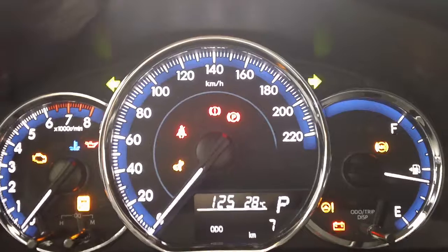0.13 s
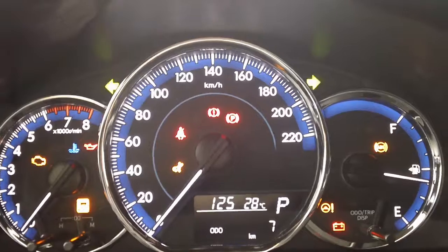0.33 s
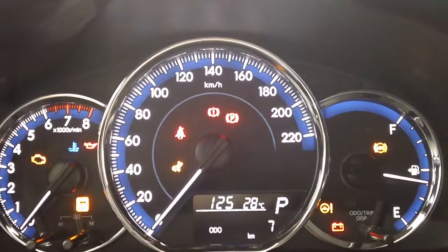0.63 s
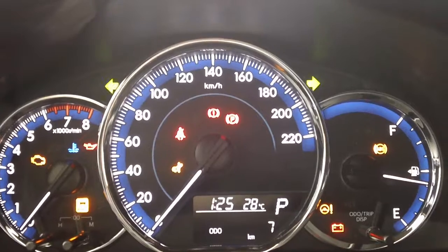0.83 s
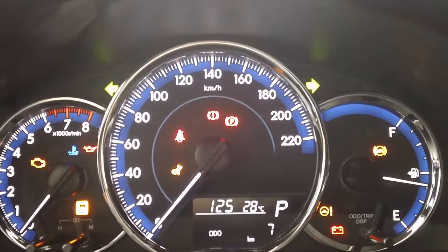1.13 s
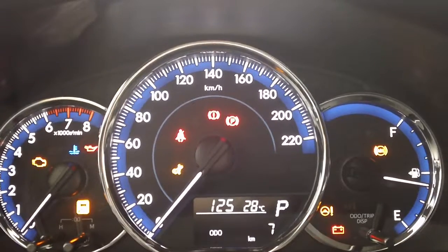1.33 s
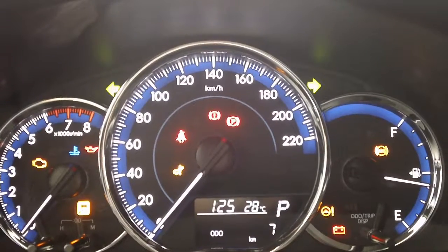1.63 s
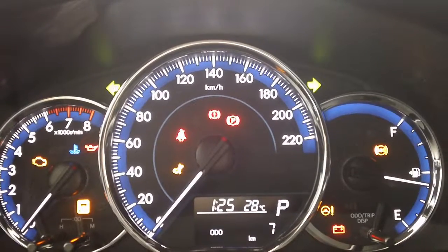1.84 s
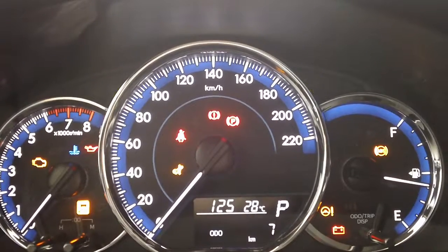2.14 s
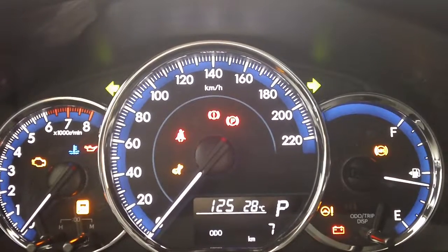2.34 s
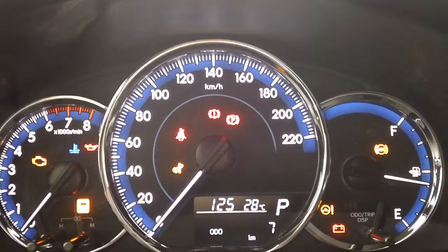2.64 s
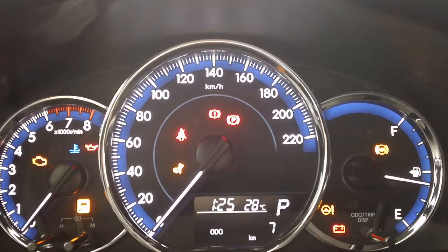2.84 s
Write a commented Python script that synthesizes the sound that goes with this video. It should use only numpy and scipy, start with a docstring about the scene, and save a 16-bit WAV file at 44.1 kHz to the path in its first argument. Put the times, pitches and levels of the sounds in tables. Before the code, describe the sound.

A car flasher relay ticks evenly, alternating fuller and thinner clicks, over steady soft hiss

```python
"""After a brief silence, soft hiss cuts in over a faint low hum, and all swells to full level in about a second.
Over it a flasher relay ticks evenly in a parked car: longer as the lamps light, shorter and thinner as they go out.
Hiss, hum and one brief high fizz are noise filtered by frequency; each tick is a sum of decaying modes,
and a dense tail of reflections from the cabin follows it. A notch and a low-pass shape the treble of all."""
import sys
import numpy as np
from scipy import signal
from scipy.fft import rfft, irfft
from scipy.io import wavfile

SR = 44100
rng = np.random.default_rng(int(sys.argv[2]) if len(sys.argv) > 2 else 0)


def bounce(signal):
    """Save signal as a 16-bit WAV file at the path given by the first command-line argument."""
    frames = np.transpose(np.atleast_2d(signal))
    limited = np.clip(frames, -1, 1)
    pcm = np.round(limited * 32767).astype(np.int16)
    wavfile.write(sys.argv[1], SR, pcm)


N = 131418
TIME = np.arange(N) / SR   # [s]
HZ = np.maximum(np.arange(N // 2 + 1) * SR / N, 1)   # frequency bins, kept above 0 for the logarithm

# levels are those ahead of the opening swell and the treble filters
HUM_HZ, HUM_WIDTH_HZ, HUM_DB = 58, 4, -80.5   # width: from the centre to half gain
HISS_DB = -38.5   # rms of the mid signal
FIZZ_HZ, FIZZ_WIDTH_HZ, FIZZ_DB = 13600, 1200, -40   # level: rms at the crest
FIZZ_CREST_S, FIZZ_LENGTH_S = .286, .008   # length: from the crest to 1/e
FIRST_CLOSING_S, BLINK_S, LIT_S = .1732, .7, .3498   # blink: whole period; lit: closing to opening
BUILD_S, CHATTER_S = .0006, .0026   # time constant of a mode's build-up; time before its decay starts
CABIN_DB, CABIN_T60_S, CABIN_DELAY_S = -13, .062, .0046   # energy of the tail against the direct tick
START_S = .106   # silence before this
NOTCH_HZ, NOTCH_WIDTH_HZ, NOTCH_CORE_HZ = 12510, 3040, 300   # core: width of the deepest part
CUTOFF_HZ = 15250


def from_db(db):
    """Amplitude gain from the logarithmic decibel scale."""
    return 10 ** (np.asarray(db) / 20)


def rms_one(x):
    """Normalise mean power: scale to unit rms."""
    return x / np.sqrt(np.mean(x ** 2) + 1e-20)


def gains(points):
    """Spectral envelope: (frequency [Hz], level [dB]) interpolated over log frequency."""
    hz, db = np.transpose(points)
    return from_db(np.interp(np.log(HZ), np.log(hz), db))


def noise(colour):
    """Spectral shaping: white noise weighted by a gain at every frequency."""
    spectrum = rfft(rng.standard_normal(N))
    return irfft(spectrum * colour, N)


def band(hz, width_hz):
    """Resonance-shaped noise: random energy gathered around one frequency, at unit rms."""
    resonance = 1 / (1 + ((HZ - hz) / width_hz) ** 2)
    return rms_one(noise(resonance))


def hum():
    """Narrow-band noise: so small a bandwidth is heard as a faint, wavering low tone."""
    return from_db(HUM_DB) * band(HUM_HZ, HUM_WIDTH_HZ)


def hiss():
    """Mid-side stereo: smooth broad noise, central but for a little independent width in the bass."""
    # spectrum of the hiss: (frequency [Hz], relative spectral density [dB])
    spectrum_points = [(25, -22), (45, -23), (80, -11), (130, -4), (220, -0.5), (450, 0.67), (1400, 0.64),
                       (4000, -1), (8700, -3.5), (12000, -8), (15000, -7)]
    # stereo width of the hiss: (frequency [Hz], side against mid [dB])
    width_points = [(30, -5), (170, -20.5), (700, -25), (1400, -67.5)]
    colour = rms_one(gains(spectrum_points))
    mid = noise(colour)
    side = noise(colour * gains(width_points))
    return from_db(HISS_DB) * np.array([mid + side, mid - side])


def fizz():
    """Amplitude modulation: a Gaussian pulse lets high band noise fizz up for a moment."""
    pulse = np.exp(-((TIME - FIZZ_CREST_S) / FIZZ_LENGTH_S) ** 2)
    return from_db(FIZZ_DB) * pulse * band(FIZZ_HZ, FIZZ_WIDTH_HZ)


def ring(start_s, hz, t60):
    """Damped oscillation: a mode builds up while the contact chatters, then decays; once in every blink."""
    age = np.maximum(TIME - start_s, 0) % BLINK_S   # time since the latest strike
    build_up = 1 - np.exp(-age / BUILD_S)
    decay = from_db(-60 * np.clip((age - CHATTER_S) / t60, 0, 2))
    return build_up * decay * np.sin(2 * np.pi * hz * age)


def relay():
    """Modal superposition: closing and opening strike the same modes, in different proportions."""
    # vibration modes of the relay: (frequency [Hz], level on closing [dB], level on opening [dB],
    # delay after the contact moves [s], time to decay by 60 dB [s])
    relay_modes = [(2650, -39.5, -51, .0028, .034), (3030, -39.5, -57, .003, .028),
                   (8920, -31, -33, .0001, 0.0066), (9200, -37, -56, .0029, .005),
                   (9430, -44, -58, 0.000395, .022)]
    ticks = np.zeros(N)
    for hz, close_db, open_db, delay_s, t60 in relay_modes:
        closing_s = FIRST_CLOSING_S + delay_s
        ticks += from_db(close_db) * ring(closing_s, hz, t60)
        ticks += from_db(open_db) * ring(closing_s + LIT_S, hz, t60)
    return ticks


def cabin(x):
    """Reverberation by convolution: dense reflections that the upholstery soon absorbs."""
    t = TIME[:SR // 4]
    decay = from_db(-60 * t / CABIN_T60_S)
    tail = rng.standard_normal(len(t)) * decay * (t > CABIN_DELAY_S)
    tail /= np.linalg.norm(tail)   # unit energy
    return from_db(CABIN_DB) * signal.fftconvolve(x, tail)[:N]


def scene():
    """Linear superposition: hum, fizz, ticks and reflections lie in the middle of the hiss."""
    ticks = relay()
    return hum() + hiss() + fizz() + ticks + cabin(ticks)


def record(dry):
    """Gain and filtering: the sound swells, a notch hollows the top treble, a low-pass cuts the very top."""
    # opening swell of everything: (time [s], level [dB])
    swell_points = [(.106, -10), (.37, -7), (.65, -4.5), (.95, -1.5), (1.2, 0), (2.98, -.2)]
    swell = from_db(np.interp(TIME, *np.transpose(swell_points)))
    out = dry * swell * (TIME >= START_S)
    for width_hz in (NOTCH_WIDTH_HZ, NOTCH_CORE_HZ):
        b, a = signal.iirnotch(NOTCH_HZ, NOTCH_HZ / width_hz, fs=SR)
        out = signal.lfilter(b, a, out)
    # order 12, 0.1 dB ripple, 70 dB rejection
    low_pass = signal.ellip(12, .1, 70, CUTOFF_HZ, fs=SR, output="sos")
    return signal.sosfilt(low_pass, out)


dry = scene()
out = record(dry)
bounce(out)
```